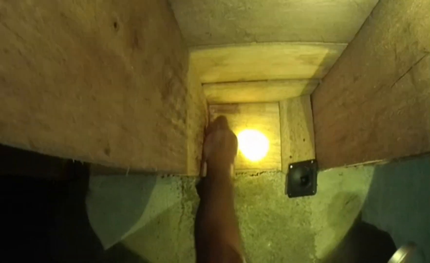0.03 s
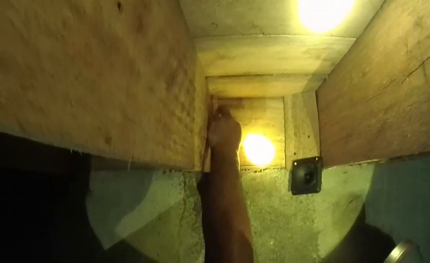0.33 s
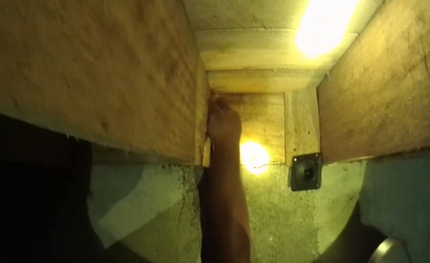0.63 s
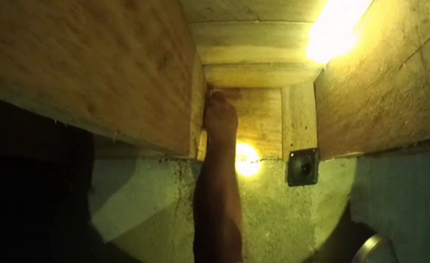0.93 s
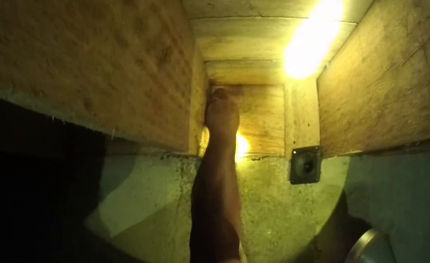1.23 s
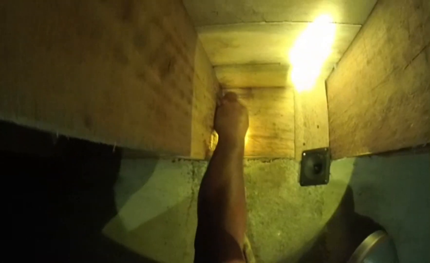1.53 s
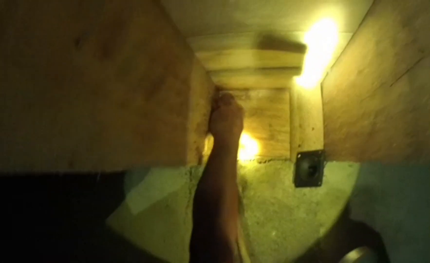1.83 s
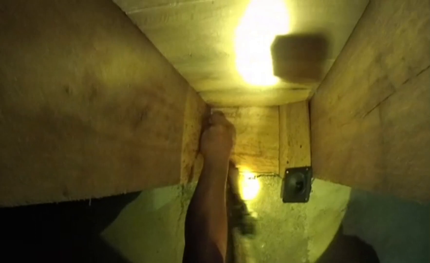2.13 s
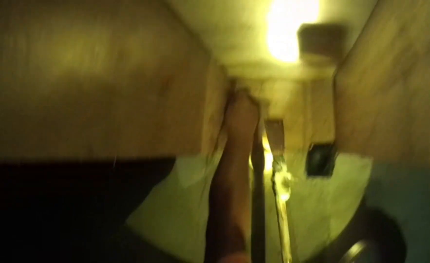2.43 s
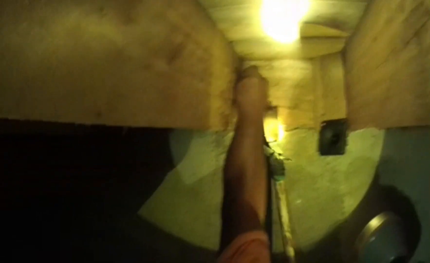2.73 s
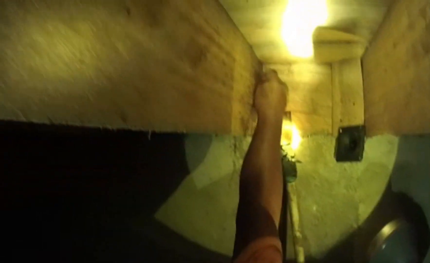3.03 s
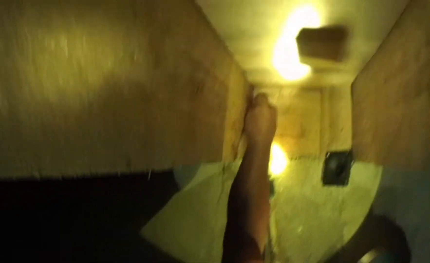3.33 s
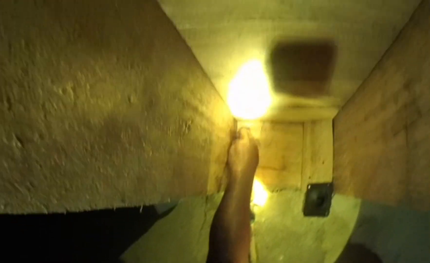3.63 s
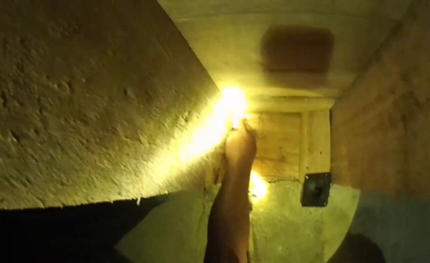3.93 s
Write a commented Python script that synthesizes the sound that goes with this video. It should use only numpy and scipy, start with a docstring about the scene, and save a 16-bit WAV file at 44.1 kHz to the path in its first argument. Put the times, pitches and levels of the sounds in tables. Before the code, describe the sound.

A colony of swiftlets buzzes and chirps indoors while someone knocks on wooden boards.

```python
"""Swiftlets in a bare building

Buzzy pulsed rasps, two-pitch chips and thin whistles over the colony's twitter, blurred by the room.
Close by, someone works on the wooden nesting boards: knocks and scuffs ring the wood, a hard tool
clacks and bounces, two dry clicks sound. Low rumble throughout; a hum comes in near the end."""
import sys
import numpy as np
from scipy import signal
from scipy.fft import rfft, irfft
from scipy.io import wavfile
from scipy.ndimage import uniform_filter1d

SR = 44100
rng = np.random.default_rng(int(sys.argv[2]) if len(sys.argv) > 2 else 0)


def wrap_up_sound(samples):
    """Save the sound to the file named by the first command line argument, as 16-bit audio."""
    columns = np.atleast_2d(samples).T
    # keep every value between -1 and 1, then stretch to whole-number steps
    tamed = np.clip(columns, -1, 1)
    steps = np.round(tamed * 32767).astype(np.int16)
    wavfile.write(sys.argv[1], SR, steps)


N = 4 * SR


def amp(db):
    """Decibels to gain."""
    return 10 ** (np.asarray(db) / 20)


def unit(x):
    """Scale to rms 1."""
    return x / np.sqrt(np.mean(x ** 2) + 1e-20)


def at_hz(points, hz):
    """Interpolate (f/Hz, value) points over log frequency."""
    f, value = np.transpose(points)
    return np.interp(np.log(hz + 1), np.log(f), value)


def envelope(points):
    """Gain per sample from (t/s, level/dB) points."""
    return amp(np.interp(np.arange(N) / SR, *np.transpose(points)))


def add(mix, start_s, sound):
    """Mix a sound in at start_s."""
    at = round(start_s * SR)
    sound = sound[max(-at, 0):]
    part = mix[max(at, 0):][:len(sound)]
    part += sound[:len(part)]


def colour(x, points):
    """Filter by (f/Hz, gain/dB) points."""
    hz = np.fft.rfftfreq(len(x), 1 / SR)
    return irfft(rfft(x) * amp(at_hz(points, hz)), len(x))


def band(x, hz, width_hz, order=2):
    """Band-pass, geometrically centred on hz."""
    low_hz = np.sqrt(hz ** 2 + width_hz ** 2 / 4) - width_hz / 2
    high_hz = min(low_hz + width_hz, SR / 2 - 1)
    return signal.sosfilt(signal.butter(order, [low_hz, high_hz], "band", fs=SR, output="sos"), x)


def ring(modes, t):
    """Decaying modes after one blow."""
    return sum(amp(db - 60 * t / t60_s) * np.sin(2 * np.pi * hz * t) for hz, db, t60_s in modes)


def note(length_s, pitches_hz, flutter_depth, edge_s=0.0038):
    """Near-sine note bending through three pitches, with fast random flutter."""
    t = np.arange(0, length_s, 1 / SR)
    flutter = unit(uniform_filter1d(rng.standard_normal(SR // 4), size=30))[:len(t)]
    contour_hz = np.polyval(np.polyfit([0, .5, 1], pitches_hz, 2), t / length_s)
    hz = contour_hz * (1 + flutter_depth * flutter)
    ramp = np.clip(np.minimum(t, length_s - t) / edge_s, 0, 1)
    return np.sqrt(2) * np.sin(ramp * np.pi / 2) ** 2 * np.sin(2 * np.pi * np.cumsum(hz) / SR)


# Rasps: t/s, length/s, rise/s, first f/Hz, last f/Hz, width/Hz, pulse rate/Hz, level/dB, throat/dB
RASP_CALLS = [(-.05, 0.26, .02, 4495, 4442, 660, 213, -19.5, -38),
              (0.052, 0.2, .02, 6470, 6320, 550, 110, -33.5, -51),
              (0.074, 0.26, .03, 5450, 5350, 950, 194, -33.5, -48),
              (0.259, 0.33, .02, 4420, 4350, 239, 190, -34.5, -49),
              (.12, 0.23, 0.034, 3397, 3365, 1200, 190, -48, -47),
              (0.382, 0.26, .012, 3700, 3530, 1090, 220, -33, -44),
              (0.484, 0.098, .015, 5390, 5350, 1600, 200, -27.5, -43),
              (0.59, 0.11, .004, 5373, 5430, 680, 185, -22, -40),
              (.69, 0.16, .01, 5520, 5360, 700, 120, -26, -36),
              (.625, .28, .015, 4560, 4690, 980, 190, -23, -35.5),
              (0.586, 0.33, .015, 6750, 7480, 1000, 110, -40.5, -42),
              (0.591, 0.33, .03, 3600, 3620, 900, 174, -32.5, -33.5),
              (0.836, 0.16, .015, 5100, 4667, 1100, 217, -32, -38),
              (0.969, .19, .015, 6600, 6690, 1300, 196, -33, -37.5),
              (0.992, .26, .008, 4646, 4690, 1000, 183, -24.5, -46),
              (1.02, 0.5, .02, 3614, 3350, 750, 174, -38.5, -46),
              (1.248, .16, .03, 4670, 4400, 970, 160, -36.5, -48),
              (1.491, 0.31, .017, 4100, 4335, 1400, 190, -38.5, -46),
              (1.549, 0.29, .035, 6170, 6480, 520, 139, -30, -45),
              (1.606, 0.42, .06, 7200, 7570, 1400, 120, -48.5, -45),
              (1.786, 0.11, .02, 6400, 6300, 820, 193, -36, -38.5),
              (1.935, 0.21, .02, 3747, 3957, 706, 220, -37.5, -42),
              (2.061, 0.23, .04, 3970, 4700, 1440, 180, -33, -31.5),
              (2.239, 0.22, .019, 4290, 4730, 1400, 174, -34, -35),
              (2.239, 0.14, .012, 6980, 6750, 1500, 190, -33.5, -38),
              (2.242, 0.2, .004, 5205, 5226, 340, 48.5, -26, -36.5),
              (2.29, 0.49, .05, 6000, 6150, 1400, 260, -34.5, -58),
              (2.622, .2, .014, 3700, 3500, 1200, 202, -38.5, -44),
              (2.669, 0.21, .052, 4346, 4480, 520, 116, -30.5, -41.5),
              (3.326, 0.18, .008, 3700, 3800, 850, 190, -38.5, -73),
              (3.935, .14, .003, 4730, 4830, 905, 200, -31, -65)]


def rasps(slowing=.35, jitter_cycles=.15, spread_db=2, sag_db_per_s=31, fall_s=0.055):
    """A slowing, uneven pulse train excites a gliding band and a low throat band."""
    out = np.zeros(N)
    for start_s, length_s, rise_s, first_hz, last_hz, width_hz, rate_hz, db, throat_db in RASP_CALLS:
        t = np.arange(0, length_s, 1 / SR)
        jitter, strength = rng.standard_normal((2, 128))
        voice_noise, throat_noise = rng.standard_normal((2, SR))[:, :len(t)]
        cycles = np.cumsum(rate_hz * (1 - slowing * t / length_s)) / SR
        cycles += np.interp(cycles, np.arange(len(jitter)), jitter_cycles * jitter)
        pulse_gain = amp(spread_db * strength[cycles.astype(int) % len(strength)])
        pulses = pulse_gain * np.exp(-(cycles % 1) / 0.28)
        centre_hz = (first_hz + last_hz) / 2
        steady = band(pulses * voice_noise, centre_hz, width_hz, order=5)
        shift_hz = np.linspace(first_hz, last_hz, len(t)) - centre_hz
        voice = (signal.hilbert(steady) * np.exp(2j * np.pi * np.cumsum(shift_hz) / SR)).real
        throat = band(pulses * throat_noise, hz=2653, width_hz=480)
        shape = np.minimum(t / rise_s, 1) * np.minimum((length_s - t) / fall_s, 1)
        shape *= amp(-sag_db_per_s * t)
        add(out, start_s, shape * (amp(db) * unit(voice) + amp(throat_db) * unit(throat)))
    return out


# Rasp overtone: f/Hz, gain/dB
OVERTONE_GAIN = [(8000, -60.5), (9500, -59), (10500, -44), (12500, -38), (13500, -29)]


def overtone(buzz):
    """Faint octave above the rasps: same envelope, doubled phase."""
    analytic = signal.hilbert(buzz)
    return colour(abs(analytic) * np.cos(2 * np.angle(analytic)), OVERTONE_GAIN)


# Chips: t/s, length/s, lower f/Hz, level/dB, upper f/Hz, level/dB
CHIP_CALLS = [(0.368, 0.013, 4410, -22, 6085, -22.5), (0.374, 0.019, 2860, -29, 5950, -52),
              (.503, 0.023, 2807, -28.5, 4370, -28), (1, 0.0296, 2720, -29, 5340, -25.5),
              (1.29, 0.014, 2635, -28.5, 4720, -31), (1.468, 0.0215, 4900, -30, 7340, -38.5),
              (2.615, 0.019, 2556, -32, 5200, -56), (3.009, 0.0089, 2700, -27.5, 5600, -27),
              (3.221, 0.01, 5000, -35, 6240, -34.5), (3.328, 0.0043, 3760, -19, 4550, -22),
              (3.442, 0.0096, 5390, -27.5, 7350, -35.5), (3.575, 0.0073, 2786, -27.5, 5410, -27),
              (3.573, 0.0068, 7100, -42, 8100, -35.5), (3.737, 0.0084, 4870, -28, 7190, -33),
              (3.899, 0.013, 5570, -29, 6700, -39), (3.94, 0.036, 3324, -35.5, 6770, -34.5),
              (3.942, 0.013, 4040, -36, 4835, -32.5)]


def chips(fall=0.033, flutter_hz=180):
    """Short falling chips, each sung on two pitches at once."""
    out = np.zeros(N)
    contour = 1 + fall * np.array([.5, 0, -.5])
    for start_s, length_s, low_hz, low_db, high_hz, high_db in CHIP_CALLS:
        for hz, db in (low_hz, low_db), (high_hz, high_db):
            add(out, start_s, amp(db) * note(length_s, hz * contour, flutter_hz / hz))
    return out


# Whistles: t/s, length/s, first f/Hz, middle f/Hz, last f/Hz, level/dB
WHISTLE_CALLS = [(1.483, 0.031, 7210, 6250, 5800, -36), (1.49, 0.06, 5000, 4910, 4860, -37.5),
                 (2.914, 0.042, 6100, 6100, 6070, -33.5), (2.955, 0.051, 5930, 5900, 5300, -45),
                 (3.127, 0.062, 6450, 6300, 6200, -37), (3.226, 0.074, 7020, 7060, 7020, -45),
                 (3.309, 0.036, 7370, 7100, 6470, -42), (3.295, 0.063, 5930, 5965, 5650, -35.5)]


def whistles():
    """Thin, bending whistles of the nearest birds."""
    out = np.zeros(N)
    for start_s, length_s, *pitches_hz, db in WHISTLE_CALLS:
        add(out, start_s, amp(db) * note(length_s, pitches_hz, flutter_depth=0.014))
    return out


# Board modes: f/Hz, level/dB, t60/s
BOARD_MODES = [(198.8, 0.5, 0.086), (295, 4, 0.052), (344.5, -1, 0.13), (387, -8, 0.075),
               (475.4, -3.5, 0.073), (527, 0, 0.053), (589, -5.5, 0.05), (702, -6, 0.061),
               (877, -9.5, 0.034), (954, -3, 0.045), (1093, 5, 0.017), (1373, -4.5, 0.096)]
# Knocks: t/s, peak level/dB, centre f/Hz, width/Hz
BOARD_KNOCKS = [(1.349, -37, 212, 116), (1.804, -19, 584, 323), (1.826, -24, 445, 282),
                (1.845, -18, 396, 306), (1.951, -15, 583, 485), (2.231, -29.5, 798, 151),
                (2.23, -33.5, 1300, 220), (2.313, -27.5, 453, 600), (3.013, -22.5, 500, 168),
                (3.449, -17, 770, 193), (3.466, -20.5, 626, 272), (3.583, -17, 432, 161),
                (3.606, -23.5, 450, 160), (3.624, -30, 453, 152), (3.89, -16, 392, 122)]
# Scuffs: peak t/s, rise/s, fall/s, level/dB, centre f/Hz, width/Hz
BOARD_SCUFFS = [(.622, 0.02, 0.017, -39.5, 695, 880), (0.9, 0.012, 0.012, -28, 473, 474),
                (.962, 0.0094, 0.014, -51, 646, 710), (1.347, 0.0043, 0.013, -43, 680, 900),
                (1.83, 0.012, 0.011, -22.5, 600, 640), (1.96, 0.043, 0.037, -36, 640, 665),
                (2.301, .025, 0.029, -41, 1335, 220), (2.12, 0.11, 0.33, -53.5, 600, 690),
                (2.55, 1, 0.097, -49.5, 563, 660), (3.042, 0.0011, 0.029, -35.5, 447, 153),
                (3.25, 0.021, 0.053, -37, 444, 267), (3.6, 0.041, 0.025, -26.5, 459, 286),
                (3.77, 0.02, 0.021, -37, 490, 315), (3.888, 0.027, 0.014, -22.5, 464, 314),
                (3.894, 0.023, 0.018, -41.5, 1190, 1220)]


def boards(thud_db=-4, thud_decay_s=0.0073, grains_per_s=900):
    """Knocks and gritty scuffs ring the same wooden boards, each in its own pitch band."""
    out, t = np.zeros(N), np.arange(SR // 2) / SR
    body = ring(BOARD_MODES, t)
    for start_s, db, hz, width_hz in BOARD_KNOCKS:
        thud = amp(thud_db) * rng.standard_normal(len(t)) * np.exp(-t / thud_decay_s)
        blow = band(body + thud, hz, width_hz)
        add(out, start_s, amp(db) * blow / abs(blow).max())
    mid_s = t.mean()
    for peak_s, rise_s, fall_s, db, hz, width_hz in BOARD_SCUFFS:
        grit = rng.standard_normal(len(t)) * (rng.random(len(t)) < grains_per_s / SR)
        rub = unit(signal.fftconvolve(grit, body)[:len(t)]) + 3.8 * unit(grit)
        swell = np.exp(np.minimum((t - mid_s) / rise_s, (mid_s - t) / fall_s))
        add(out, peak_s - mid_s, amp(db) * swell * unit(band(rub, hz, width_hz)))
    return out


# Tool strike and bounces: t/s, level/dB
TOOL_HITS = [(1.8857, -19), (1.893, -48), (1.899, -24), (1.931, -26), (1.949, -31)]
# Impact spectrum: f/Hz, relative level/dB
TOOL_SPECTRUM = [(200, -3), (700, -6.5), (1100, -2.5), (1600, -8.5), (2300, 2), (4000, -5), (5200, -9.5),
                 (7000, -21), (11000, -39), (15000, -52)]
# Tool modes: f/Hz, level/dB, t60/s
TOOL_MODES = [(9000, -30, 0.083), (10300, -44, .06), (11700, -36, .06)]


def tool_clack(decay_s=0.011):
    """A hard tool strikes and bounces: noise bursts with a faint high ring."""
    out, t = np.zeros(N), np.arange(SR // 4) / SR
    for start_s, db in TOOL_HITS:
        crack = unit(colour(rng.standard_normal(len(t)), TOOL_SPECTRUM)) * np.exp(-t / decay_s)
        add(out, start_s, amp(db) * (1.05 * crack + ring(TOOL_MODES, t)))
    return out


# Clicks: t/s, peak level/dB
CLICK_HITS = [(2.1541, -16), (2.914, -20)]
# Click modes: f/Hz, level/dB, t60/s
CLICK_RING = [(600, -38, 0.021), (980, -10, 0.045), (1420, 3, 0.007), (1790, 1.5, 0.0067)]


def clicks(rise_s=0.00037):
    """Two close, dry clicks from heavily damped modes."""
    out, t = np.zeros(N), np.arange(SR // 10) / SR
    click = ring(CLICK_RING, t) * np.minimum(t / rise_s, 1)
    for start_s, db in CLICK_HITS:
        add(out, start_s, amp(db) * click / abs(click).max())
    return out


# Colony spectrum: f/Hz, relative level/dB
COLONY_SPECTRUM = [(1500, -56), (1950, -28.5), (2250, -8.5), (2700, -6.5), (3200, -7), (4000, -2),
                   (4700, 1), (5600, -2.5), (6500, -3.5), (7300, -22), (8300, -19), (9200, -46),
                   (15000, -71)]
# Colony loudness: t/s, level/dB
COLONY_LEVEL = [(0, -24), (.33, -43.5), (.7, -34.5), (1.1, -33.5), (1.44, -41.5), (1.7, -34.5), (2.0, -49),
                (2.35, -29.5), (2.58, -40), (2.9, -38.5), (3.15, -44.5), (3.4, -41.5), (3.8, -42), (4, -39)]


def colony(calls_per_s=90, low_hz=2100, high_hz=8200, hiss_gain=.55):
    """Hundreds of far chirps, blurred by the building and blended with hiss."""
    chirps = np.zeros(N)
    for when, pitch, span, bend in rng.random((int(calls_per_s * N / SR), 4)):
        hz = low_hz * (high_hz / low_hz) ** pitch
        contour = 1 + 0.2577 * (bend - .5) * np.array([1, 0, -1])
        length_s = 0.01957 + .07 * span
        add(chirps, when * N / SR - .03, note(length_s, hz * contour, flutter_depth=0.0562))
    blur = unit(room(chirps, wet_db=2)) + hiss_gain * rng.standard_normal(N)
    return envelope(COLONY_LEVEL) * unit(colour(board_echoes(blur), COLONY_SPECTRUM))


# Board reflections: delay/s, gain
ECHO_TAPS = [(.0023, 0.14), (.0041, -0.15), (.0067, 0.15), (.0094, -0.0042), (0.0133, -0.0027)]


def board_echoes(x):
    """Early reflections off nearby boards comb-filter the calls."""
    out = x.copy()
    for delay_s, gain in ECHO_TAPS:
        add(out, delay_s, gain * x)
    return out / np.sqrt(1 + sum(gain ** 2 for _, gain in ECHO_TAPS))


# Reverberation: f/Hz, t60/s
ROOM_T60 = [(150, 1), (500, 0.39), (1500, 0.93), (3000, 0.99), (5000, 0.7), (8000, 0.48), (14000, 0.53)]


def room(x, wet_db, onset_s=0.0026):
    """Add the building's dense echoes, each band decaying at its own rate."""
    hz, t, noise = signal.stft(rng.standard_normal(SR), SR, nperseg=256)
    decay = amp(-60 * t / at_hz(ROOM_T60, hz)[:, None])
    tail = signal.istft(noise * decay, SR, nperseg=256)[1]
    tail *= np.minimum(np.arange(len(tail)) / SR / onset_s, 1)
    tail /= np.sqrt(np.mean(abs(rfft(tail, SR)[300:6000]) ** 2))  # unity gain over 300-6000 Hz
    wet = amp(wet_db) * signal.fftconvolve(x, tail)[:N]
    return (x + wet) / np.sqrt(1 + amp(wet_db) ** 2)


# Room rumble: f/Hz, relative level/dB
RUMBLE_SPECTRUM = [(10, 4.5), (28, -0.5), (60, -7.5), (120, -16.5), (250, -23.5), (600, -29), (1500, -33.5),
                   (4000, -25), (9000, -46), (15000, -52.5)]


def rumble(level_db=-45):
    """Steady low noise of the room."""
    return amp(level_db) * unit(colour(rng.standard_normal(N), RUMBLE_SPECTRUM))


# Hum loudness: t/s, level/dB
HUM_LEVEL = [(3.5, -100), (3.54, -64), (3.62, -41), (3.72, -42), (3.79, -55), (3.88, -35.5), (4, -32.5)]


def hum(hz=116, waver_hz=10):
    """Low tone near the end, its pitch wavering at random."""
    waver = unit(uniform_filter1d(rng.standard_normal(N), size=900))
    phase = 2 * np.pi * np.cumsum(hz + waver_hz * waver) / SR
    return envelope(HUM_LEVEL) * np.sin(phase)


def scene():
    """Birds and board work in one room, mono."""
    buzz = room(rasps(), wet_db=2)
    calls = board_echoes(buzz + room(chips(), wet_db=1) + room(whistles(), wet_db=-1.5))
    call_band = signal.butter(9, [2080, 8400], "band", fs=SR, output="sos")
    birds = signal.sosfilt(call_band, calls) + overtone(buzz)
    work = room(boards(), wet_db=-4) + room(tool_clack(), wet_db=-3.5) + room(clicks(), wet_db=-40)
    return (birds + colony() + work + rumble() + hum())[None]


def record(dry, cutoff_hz=15200):
    """Steep low-pass on the mix."""
    lowpass = signal.firwin(511, cutoff_hz, window=("kaiser", 9), fs=SR)
    return signal.oaconvolve(dry, lowpass[None], "same")


dry = scene()
out = record(dry)
wrap_up_sound(out)
```